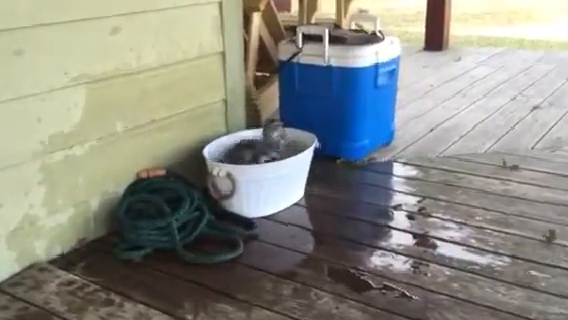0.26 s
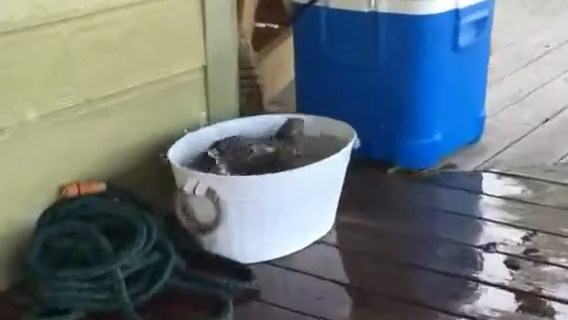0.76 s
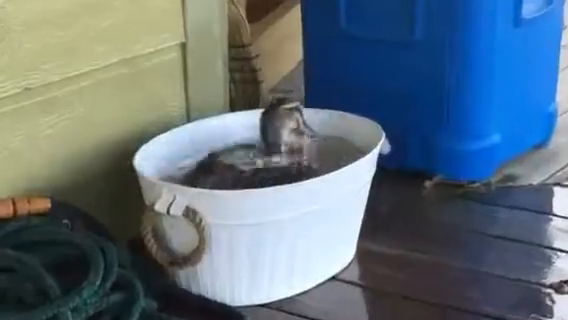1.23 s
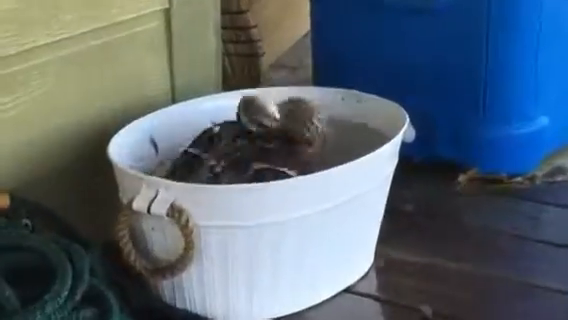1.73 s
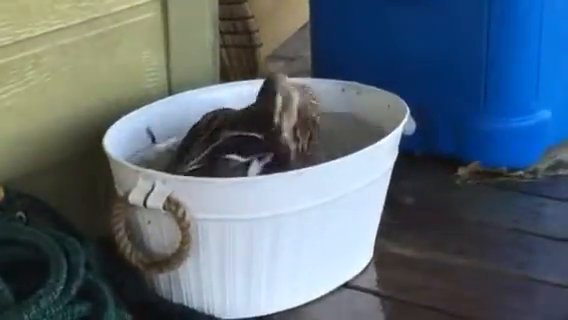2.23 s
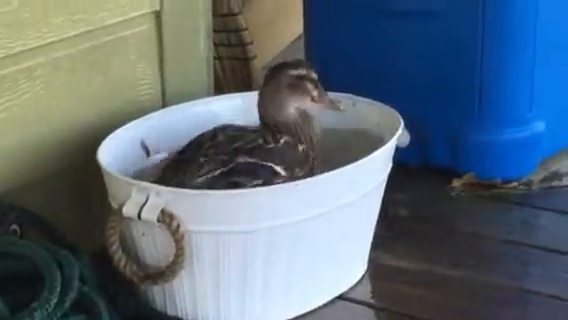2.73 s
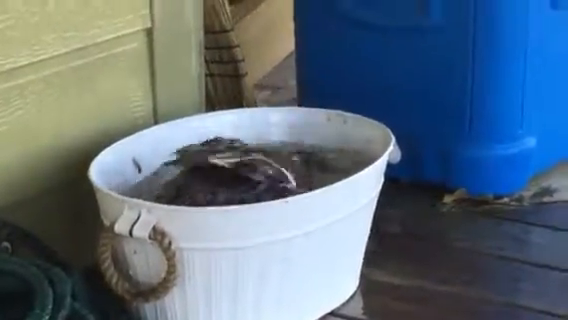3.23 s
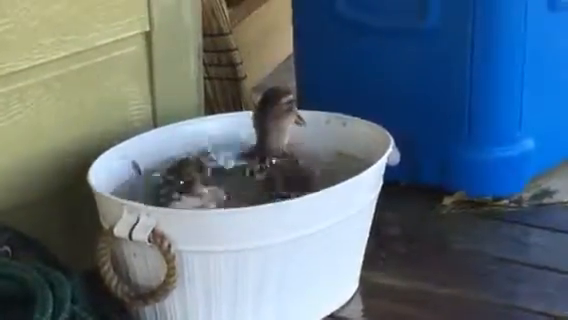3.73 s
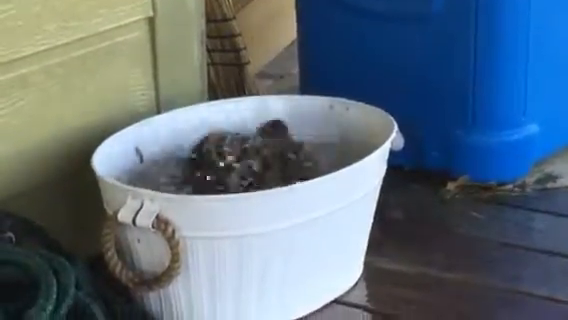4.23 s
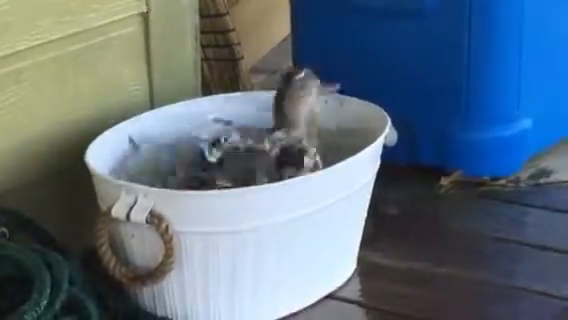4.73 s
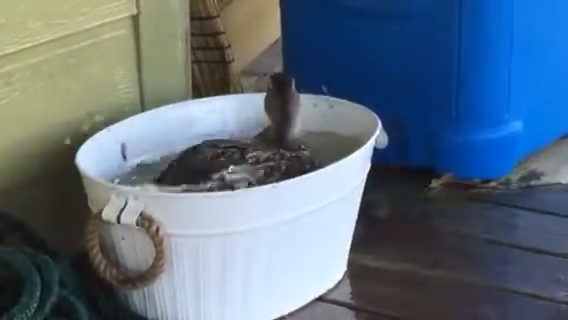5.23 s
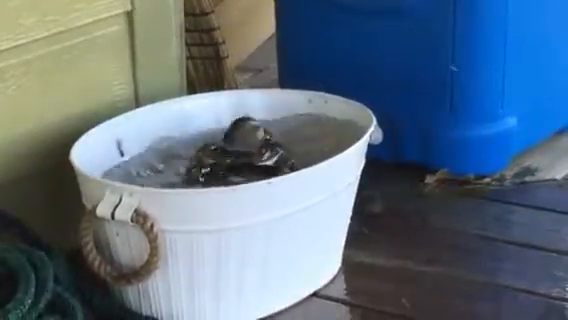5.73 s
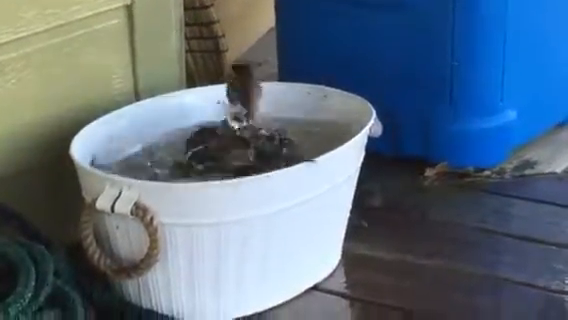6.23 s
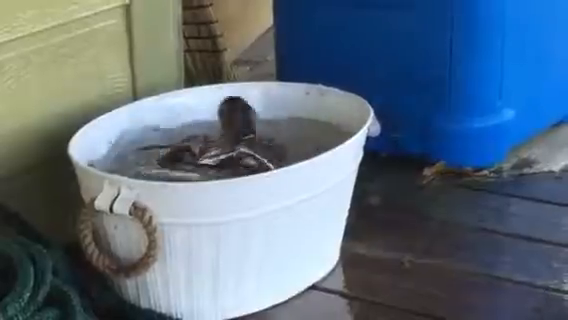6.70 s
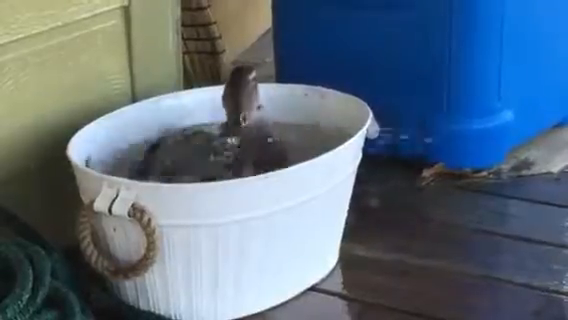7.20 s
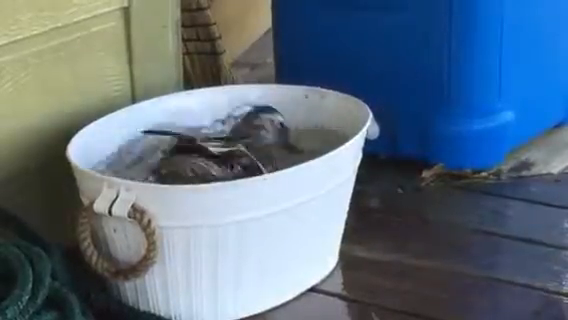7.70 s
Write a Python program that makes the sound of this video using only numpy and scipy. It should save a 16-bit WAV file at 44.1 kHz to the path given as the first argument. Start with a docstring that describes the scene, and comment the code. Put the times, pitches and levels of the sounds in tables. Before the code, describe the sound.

A duck bathes in a small tub of water on a wooden porch. Uneven bursts of bright bubbly plinks, light slaps and fine spray come quickly, pause for over a second, then return busier and thin out toward the end. Short reflections from the porch surround the water. Low wind lumps bump the microphone, a few dry taps sound close by, and a faint road murmurs far away.

```python
"""On a wooden porch, a duck bathes in a metal tub. Bubbles plink as ringing tones, water slaps the wall and
spray ticks on the boards as short puffs of noise; the porch walls throw the sounds of the water back.
Dry taps are heard close by, and wind buffets the microphone as lumpy low noise.
Far off are the shaped noise of a road and a passing vehicle, still air, a wavering motor hum and a faint
twitter of sliding tones."""
import sys
import numpy as np
from scipy import signal
from scipy.io import wavfile
from scipy.ndimage import uniform_filter1d

SR = 44100
rng = np.random.default_rng(int(sys.argv[2]) if len(sys.argv) > 2 else 0)


def dump_mix(stems):
    """Bounce the given channels to the path in sys.argv[1] as a 16-bit WAV at rate SR."""
    frames = np.atleast_2d(stems).T  # one column per channel
    limited = np.clip(frames, -1, 1)  # hard clip at full scale
    pcm = np.round(limited * 32767).astype(np.int16)
    wavfile.write(sys.argv[1], SR, pcm)


N = 351036  # length of the scene in samples


def water():
    """All the bath water: single sounds stand out over the crowds of bubbles and spray that each stroke stirs."""
    return clear_bubbles() + slaps() + ticks() + churn() + spray()


# the clearest bubbles and drops entering the water: (time [s], level [dB], pitch [Hz])
BUBBLES = [(0.06, -51, 595), (0.1046, -46, 4900), (0.119, -47.5, 3820), (0.305, -45, 3010),
           (0.3716, -43.5, 1710), (0.397, -39, 4280), (0.4006, -38.5, 1860), (0.4042, -40.5, 1150),
           (0.46, -46, 2880), (0.541, -42.5, 2970), (0.595, -44.5, 1800), (0.5996, -36.5, 4430),
           (0.7175, -55, 1860), (0.7185, -39, 3460), (0.727, -47.5, 644), (0.7366, -46, 2500),
           (0.7835, -28.5, 1870), (1.0427, -40.5, 2120), (1.099, -41, 4500), (1.153, -34.5, 5800),
           (1.194, -43.5, 2770), (1.3652, -40, 2880), (1.366, -44, 4300), (1.408, -43.5, 3750),
           (1.428, -41, 5300), (1.507, -39, 2160), (1.5217, -41, 4560), (1.5278, -34, 3040),
           (1.614, -42, 2160), (1.655, -44, 2920), (1.7507, -44.5, 2500), (1.8052, -32, 2190),
           (1.8924, -43.5, 4750), (1.913, -48, 2730), (1.943, -39, 1580), (2.177, -50, 2330),
           (2.231, -53, 6200), (2.435, -55, 3380), (3.34, -54, 2070), (3.403, -46.5, 4470),
           (3.454, -53, 2630), (3.5152, -53.5, 2250), (3.53, -50, 603), (3.588, -51.5, 1400),
           (3.727, -46, 4050), (3.734, -39.5, 2490), (3.7651, -32, 2030), (3.8782, -43.5, 743),
           (3.8844, -29, 5750), (4.0292, -37.5, 1540), (4.0587, -35.5, 925), (4.078, -44, 2030),
           (4.1126, -40, 2160), (4.2288, -44, 6300), (4.2277, -46.5, 2080), (4.3033, -42, 4600),
           (4.3283, -49, 2250), (4.396, -45, 2250), (4.5374, -46.5, 3630), (4.5799, -48, 1910),
           (4.653, -50, 690), (4.633, -44.5, 6500), (4.6624, -44, 3420), (4.6646, -47, 5300),
           (4.6742, -41.5, 1600), (4.687, -38, 2190), (4.745, -39.5, 2340), (4.7808, -37.5, 4000),
           (4.8315, -39, 3860), (4.839, -37, 2230), (4.8917, -43.5, 1700), (4.934, -36.5, 4000),
           (4.9367, -45.5, 2550), (4.9372, -36.5, 1850), (4.94, -45, 905), (5.044, -33, 2280),
           (5.013, -46, 4900), (5.0627, -36, 5740), (5.063, -33.5, 2910), (5.1171, -42, 1660),
           (5.1598, -43, 2400), (5.1939, -44.5, 2240), (5.2896, -41, 4180), (5.3693, -46, 763),
           (5.402, -52, 4470), (5.413, -42, 6650), (5.4323, -53, 1440), (5.5802, -49.5, 2930),
           (6.0847, -39, 4340), (6.1156, -39.5, 2030), (6.1896, -36, 6750), (6.2347, -38, 2730),
           (6.343, -50, 744), (6.408, -51, 5860), (6.494, -49, 2030), (6.5643, -36, 4900),
           (6.6761, -38.5, 2170), (6.7, -44.5, 613), (6.803, -58, 1160), (7.058, -60, 1020),
           (7.066, -53, 2600), (7.093, -41.5, 6700), (7.1783, -45, 2240), (7.1799, -36.5, 1690),
           (7.2495, -48.5, 1270), (7.5, -60, 2870), (7.559, -48.5, 1084), (7.667, -49, 1940),
           (7.676, -47, 577), (7.745, -42, 3500), (7.7564, -41, 626), (7.83, -53, 1330),
           (7.8547, -46, 2230), (7.886, -41.5, 2010)]
RING_CYCLES, RING_SPREAD = 6.7, 0.093  # typical cycles a 2 kHz bubble rings, random spread (natural log)
RING_LAW = -0.14  # power of pitch: higher bubbles ring for fewer cycles
CLIMB = 0.0004  # sets the pitch climb, for each cycle a bubble rings: long ringers climb most


def clear_bubbles():
    """Each trapped pocket of air rings at its own pitch."""
    rows = []
    for time, db, hz in BUBBLES:
        luck = np.exp(RING_SPREAD * rng.standard_normal())
        cycles = RING_CYCLES * (hz / 2000) ** RING_LAW * luck
        rows.append((time, db, bubble(hz, cycles, CLIMB * cycles)))
    return play(rows)


def bubble(hz, cycles, rise):
    """A ringing pocket of air: quick start, dies in a few cycles, pitch climbing as it nears the surface."""
    cycles = np.clip(cycles, 0.7, 40)
    u = np.arange(int(4 * cycles * SR / hz)) * hz / SR  # time, counted in cycles of the starting pitch
    loudness = (1 - np.exp(-u / 0.27)) * np.exp(-2 * u / cycles)
    ring = loudness * np.sin(2 * np.pi * u * (1 + rise * u))
    return ring / abs(ring).max()


# water slapping the tub wall: (time [s], level [dB], lowest frequency [Hz], highest frequency [Hz])
SLAPS = [(1.042, -43, 250, 1540), (1.085, -40, 150, 330), (3.878, -42, 490, 9050),
         (5.367, -48.5, 380, 1100), (3.706, -57, 1500, 11900), (6.675, -41.5, 586, 2760),
         (6.701, -45, 282, 460), (7.178, -49.5, 450, 3970), (7.668, -50, 250, 4020), (7.70, -50, 212, 398)]


def slaps():
    """Flat blows of water against the tub wall."""
    return play((time, db, puff(lo_hz, hi_hz, 0.14)) for time, db, lo_hz, hi_hz in SLAPS)


# thrown spray landing on tub and boards: (time [s], level [dB], centre frequency [Hz])
TICKS = [(0.2987, -49.5, 8250), (0.5997, -44, 7000), (0.7182, -39.5, 6940), (0.846, -47, 11900),
         (1.1526, -33, 14300), (1.5225, -46, 9020), (1.8058, -39, 12700), (2.52, -44, 10000),
         (3.16, -52, 12800), (3.517, -45.5, 14600), (3.6681, -55, 10800), (3.8267, -46, 10400),
         (3.8494, -39, 9800), (3.883, -36.5, 9500), (4.144, -44, 14600), (4.4243, -53, 13800),
         (4.482, -46, 11800), (4.537, -45, 7600), (4.632, -42, 14300), (4.69, -37, 14400),
         (4.746, -44, 6540), (4.7775, -38.5, 14200), (4.903, -34.5, 10700), (5.0494, -53, 7010),
         (5.064, -36, 10000), (5.325, -51.5, 8000), (6.1343, -51.5, 7150), (6.1897, -40.5, 7500),
         (6.4903, -40.5, 12700), (7.009, -52.5, 7760), (7.1357, -62, 12700), (7.17, -37.5, 11800),
         (7.741, -47, 13000), (7.858, -56, 8250), (7.873, -44, 13100), (7.895, -43.5, 7200)]
TICK_T60, TICK_WIDTH = 0.04, 1.18  # time to fall by 60 dB [s], ratio of band edge to centre


def ticks():
    """Each landing drop of spray is a tiny, narrow puff."""
    return play((time, db, puff(hz / TICK_WIDTH, hz * TICK_WIDTH, TICK_T60)) for time, db, hz in TICKS)


def puff(lo_hz, hi_hz, t60):
    """A blow of water: a band of noise that starts almost at once and dies fast."""
    t = np.arange(SR // 4) / SR
    band = signal.butter(3, [lo_hz, hi_hz], "band", fs=SR, output="sos")
    rush = evened(signal.sosfilt(band, rng.standard_normal(len(t)))) / 2
    rise = 1 - np.exp(-t / 0.0017)  # seconds
    return rush * gain_of(-60 * t / t60) * rise


def churn():
    """A crowd of small bubbles, stirred up by each stroke over a faint lapping."""
    return stirring(column=2, rest_db=-88) * swarm(1374, 4940, cycles=7.8, per_s=800, spread_db=6.0)


def spray():
    """A crowd of high, short droplet rings, thrown up by each stroke over a faint mist."""
    return stirring(column=3, rest_db=-81) * swarm(5050, SR / 3, cycles=6, per_s=2500, spread_db=5.5)


# strokes of wings, head and body: (start [s], length [s], churn level [dB], spray level [dB])
STROKES = [(0.0, 0.3, -81, -80), (0.303, 0.32, -66, -68), (0.699, 0.082, -57.5, -61),
           (1.043, 0.17, -67, -68.5), (1.2, 0.28, -74, -69.5), (1.502, 0.1, -64.5, -63.5),
           (1.784, 0.024, -71, -62), (3.421, 0.2, -71, -75), (3.698, 0.23, -61, -60.5),
           (3.996, 0.069, -62.5, -63), (4.13, 0.15, -71, -68), (4.52, 0.11, -67, -70.5),
           (4.634, 0.27, -61.5, -64), (4.877, 0.12, -61.5, -60.5), (5.038, 0.086, -63.5, -62.5),
           (5.14, 0.21, -69.5, -74), (5.392, 0.025, -68, -63), (5.515, 0.089, -79, -73),
           (5.816, 0.098, -77, -72.5), (6.052, 0.24, -72.5, -69), (6.483, 0.054, -74, -68),
           (6.994, 0.021, -74.5, -70), (7.09, 0.091, -84, -65), (7.382, 0.021, -80, -71),
           (7.657, 0.19, -71.5, -78.5), (7.83, 0.054, -74, -66)]
STIR_S, SETTLE_DB_PER_S = 0.004, 245  # time to rise by 20 dB up to the start [s], speed of settling [dB per s]


def stirring(column, rest_db):
    """Gain of a swarm: each stroke rises, holds for its length and settles, over a faint rest."""
    t = np.arange(N) / SR
    level_db = np.full(N, float(rest_db))
    for row in STROKES:
        start, length = row[:2]
        before_db = 20 * (start - t) / STIR_S
        after_db = SETTLE_DB_PER_S * (t - start - length)
        shape_db = np.minimum(-np.maximum(before_db, after_db), 0)
        level_db = np.maximum(level_db, row[column] + shape_db)
    return gain_of(level_db)


def swarm(lo_hz, hi_hz, cycles, per_s, spread_db, count=30):
    """Many small bubbles at random moments, each with one of `count` pitches; a few are strong."""
    at = np.flatnonzero(rng.random(N) < per_s / SR)
    draw = rng.random((N, 2))[at]
    size = gain_of(spread_db * np.minimum(-np.log(draw[:, 0] + 1e-9), 4))
    kind = (draw[:, 1] * count).astype(int)
    out = np.zeros(N)
    for k, hz in enumerate(np.geomspace(lo_hz, hi_hz, count)):
        ring = bubble(hz, cycles, 0.0055)
        mine = kind == k
        # add a copy of the ring, scaled by its size, at every moment of this kind
        places = at[mine, None] + np.arange(len(ring))
        copies = size[mine, None] * ring
        out += np.bincount(places.ravel(), copies.ravel(), 2 * N)[:N]
    return evened(out)


# bubbles bursting at the surface: (time [s], level [dB], start pitch [Hz], end pitch [Hz], length [s])
GLUGS = [(5.909, -62, 840, 1950, 0.035), (6.153, -43, 1086, 2020, 0.026), (7.823, -56, 1066, 1503, 0.029)]


def glugs():
    """Bursting bubbles, whose pitch shoots up."""
    return play((time, db, glug(*shape)) for time, db, *shape in GLUGS)


def glug(start_hz, end_hz, length):
    """A tone that swells and fades while it slides up."""
    u = np.arange(0, 1, 1 / (length * SR))
    hz = start_hz + (end_hz - start_hz) * u
    return np.sin(np.pi * u ** 1.1) * np.sin(2 * np.pi * np.cumsum(hz) / SR)


def porch(x, count=4):
    """Dense reflections: the sound takes turns between a few random tails, so no single tail colours it."""
    turn = (np.arange(N) // 1500) % count  # the next tail every 1500 samples
    reflections = np.zeros(N)
    for k in range(count):
        share = uniform_filter1d(1.0 * (turn == k), size=300)  # soft switch between tails
        reflections += signal.oaconvolve(x * share, tail())[:N]
    return x + gain_of(-9) * reflections


# how the porch reflects: (frequency [Hz], time to fall by 60 dB at first [s], relative strength [dB])
PORCH = [(300, 0.64, 0), (1000, 0.21, 0), (2500, 0.19, 4), (6400, 0.077, 1.5), (14000, 0.073, -5.5)]


def tail():
    """Sparse taps of random sign, each band dying at its own speed, faster once the sound has left the porch."""
    taps = np.zeros(SR // 3)
    at = np.arange(60, len(taps) - 20, 20)
    taps[at + rng.integers(0, 20, len(at))] = rng.choice([-1.0, 1.0], len(at))
    hz, t, z = signal.stft(taps, SR, nperseg=256)
    strength_db = read(PORCH, hz, column=2)[:, None]
    fade_db = 60 * t / read(PORCH, hz)[:, None]
    leaving_db = 150 * np.maximum(t - 0.065, 0)  # extra fall after 65 ms
    return signal.istft(z * gain_of(strength_db - fade_db - leaving_db), SR, nperseg=256)[1]


# short dry taps close to the microphone: (time [s], level [dB], pitch [Hz], cycles it rings)
KNOCKS = [(.156, -41.5, 685, 3.1), (0.378, -42.5, 443, 3.5), (0.436, -45.5, 490, 2.5),
          (3.047, -50, 1310, 1.6), (4.357, -35, 277, 8.2), (5.865, -42, 2085, 32)]


def knocks():
    """Dry taps at a steady pitch; most die within a few cycles."""
    return play((time, db, bubble(hz, cycles, 0)) for time, db, hz, cycles in KNOCKS)


# changing strength of the wind on the microphone, beneath the single gusts: (time [s], level [dB])
WIND = [(0, -41.5), (.21, -58.5), (.5, -51), (1.4, -45), (1.55, -52), (2.1, -51), (2.45, -48), (2.8, -39),
        (3.03, -49.5), (3.15, -42.5), (3.33, -47.5), (3.8, -44), (4.2, -43.5), (4.75, -41.5), (5.3, -47.5),
        (5.8, -54), (6.35, -43), (6.45, -54), (7.1, -50.5), (7.96, -49.5)]
# single gusts that thump the microphone: (middle [s], level [dB])
GUSTS = [(0.291, -56), (0.47, -51), (0.79, -49.5), (1.669, -43.5), (1.741, -34), (1.9, -49), (2.421, -52),
         (2.511, -40), (3.13, -45), (3.86, -39.5), (4.01, -38.5), (4.361, -31.5), (4.469, -34), (4.62, -53),
         (4.72, -43), (5.04, -59), (5.21, -43), (5.291, -43), (5.891, -43.5), (6.378, -42.5),
         (6.581, -36.5), (6.95, -45), (7.17, -55), (7.352, -35.5), (7.6, -47), (7.85, -53)]
# tone colour of the buffeting: (frequency [Hz], relative level [dB per Hz])
BUFFET = [(15, -67), (25, 5.5), (48, -0.5), (73, 3), (198, -12), (281, -25.5), (341, -30), (429, -35),
          (450, -70), (580, -57), (990, -120)]
GUST_S = 0.013  # half width of a gust [s]


def wind():
    """Low turbulence that comes in short lumps; strong gusts are bent out of shape, so they reach higher."""
    t = np.arange(N) / SR
    lumps = evened(smoothed(rng.standard_normal(N), 700, 700))
    strength = gain_of(curve(WIND))
    for middle, db in GUSTS:
        strength += gain_of(db) * np.exp(-((t - middle) / GUST_S) ** 2)
    turbulence = evened(noise(BUFFET, 1.22, size=2048) * gain_of(2.58 * lumps))
    gusts = strength * turbulence
    return gusts + gusts * abs(gusts)


# distant road: (time [s], level [dB])
ROAD = [(0.0, -55), (0.29, -64.5), (0.75, -56.5), (1.68, -64), (2.44, -60), (3.3, -65.5), (3.55, -58),
        (4.39, -64), (4.88, -62.5), (5.76, -68), (7.54, -68.5), (7.8, -60), (7.96, -62.5)]
# tone colour of the road: (frequency [Hz], relative level [dB per Hz])
ROAD_COLOUR = [(180, -52), (300, -9.5), (448, 1.5), (714, 8), (1070, 5), (1760, -5.5), (2400, -3.5),
               (2800, -13.5), (4000, -28), (5200, -56), (8800, -120)]


def road():
    """Far traffic: noise of one colour whose level swells and sinks."""
    return gain_of(curve(ROAD)) * noise(ROAD_COLOUR, 1.8)


# brighter rush of a vehicle passing far off: (middle [s], half width [s], level [dB])
PASSING = (0.79, 0.38, -55.5)
# tone colour of that rush: (frequency [Hz], relative level [dB per Hz])
PASSING_COLOUR = [(500, -38), (900, -5), (1200, 4), (1600, -3), (2600, -37), (5000, -100)]


def passing():
    """A band of rush that swells and fades."""
    middle, width, db = PASSING
    swell = np.exp(-((np.arange(N) / SR - middle) / width) ** 2)
    return gain_of(db) * swell * noise(PASSING_COLOUR, 2.4)


# faint hum of a far motor: (frequency [Hz], level [dB])
HUM = [(98, -61.5), (193, -67.5)]


def hum():
    """Each partial is a tone whose strength and phase wander."""
    t = np.arange(N) / SR
    span = int(SR / 9.9)  # a tenth of a second of smoothing makes the wander slow
    a, b = smoothed(rng.standard_normal((2, N)), span, span // 2)
    out = np.zeros(N)
    for hz, db in HUM:
        turn = 2 * np.pi * hz * t
        out += gain_of(db) * evened(a * np.cos(turn) + b * np.sin(turn))
    return out


# faint high twitter of small birds or insects: (lowest start pitch [Hz], highest start pitch [Hz],
# chirps per second [1/s], chirp length [s], fall in pitch [Hz], level of the softest chirps [dB])
TWITTER = (8100, 9400, 17, .065, 250, -83)


def twitter():
    """Short, slightly husky chirps that slide down, at uneven moments."""
    lo_hz, hi_hz, per_s, length, fall_hz, softest_db = TWITTER
    t = np.arange(0, length, 1 / SR)
    rows = []
    for k, (late, pitch, size) in enumerate(rng.random((int(per_s * N / SR), 3))):
        hz = lo_hz + (hi_hz - lo_hz) * pitch - fall_hz * t / length
        husk = 1 + 0.61 * evened(uniform_filter1d(rng.standard_normal(len(t)), size=60))
        chirp = husk * np.hanning(len(t)) * np.sin(2 * np.pi * np.cumsum(hz) / SR)
        rows.append(((k + late) / per_s, softest_db + 7 * size, chirp))
    return play(rows)


# tone colour of still air: (frequency [Hz], relative level [dB per Hz])
AIR = [(1200, -16), (2000, -1), (3000, -4), (4480, -4), (5740, -18), (6600, -3.5), (7500, -57), (8700, -2),
       (10300, -18), (11500, -13.5), (16000, -14)]


def air():
    """Still air: a faint, unchanging hiss."""
    return gain_of(-73.5) * noise(AIR, 1.0)


def noise(colour, patchy_db, size=1024):
    """Random short-time spectra of a given colour, stronger and weaker in patches of time and pitch."""
    hz = np.fft.rfftfreq(size, 1 / SR)
    a, b, patches = rng.standard_normal((4 * N // size + 5, len(hz), 3)).T
    patches = uniform_filter1d(uniform_filter1d(patches, size=8, axis=0), size=8, axis=1)
    level_db = read(colour, hz)[:, None] + patchy_db * evened(patches)
    z = (a + 1j * b) * gain_of(level_db)
    return evened(signal.istft(z, nperseg=size, noverlap=3 * size // 4)[1][:N])


def play(rows):
    """Lays (time [s], level [dB], sound) rows on one track."""
    out = np.zeros(N)
    for time, db, sound in rows:
        part = out[round(time * SR):][:len(sound)]
        part += gain_of(db) * sound[:len(part)]
    return out


def gain_of(db):
    """Turns decibels into a multiplier."""
    return 10 ** (np.asarray(db) / 20)


def evened(x):
    """Scales a signal to an average (RMS) strength of 1."""
    return x / np.sqrt(np.mean(x ** 2) + 1e-20)


def smoothed(x, first, second):
    """Two running averages, one after the other, over the given numbers of samples."""
    return uniform_filter1d(uniform_filter1d(x, size=first), size=second)


def curve(rows):
    """Joins (time [s], level [dB]) points with straight lines, one value for every sample."""
    rows = np.array(rows)
    return np.interp(np.arange(N) / SR, rows[:, 0], rows[:, 1])


def read(points, hz, column=1):
    """Reads a table at any frequency, with frequency on a log scale."""
    points = np.array(points)
    return np.interp(np.log(hz + 1), np.log(points[:, 0] + 1), points[:, column])


def scene():
    """Adds the bath with its reflections, the close taps, the wind and the far background."""
    bursts = glugs()  # aimed up out of the tub, so drier than the rest
    bath = porch(water() + 0.44 * bursts) + bursts
    far = road() + passing() + hum() + twitter() + air()
    return (bath + knocks() + wind() + far)[None]


def record(dry):
    """The microphone drops the deepest bass; then the highest treble is cut off."""
    thinned = signal.sosfilt(signal.butter(4, 39, "high", fs=SR, output="sos"), dry)
    treble_cut = signal.firwin(511, 15950, window=("kaiser", 9), fs=SR)
    return signal.oaconvolve(thinned, treble_cut[None], "same")


dry = scene()
out = record(dry)
dump_mix(out)
```